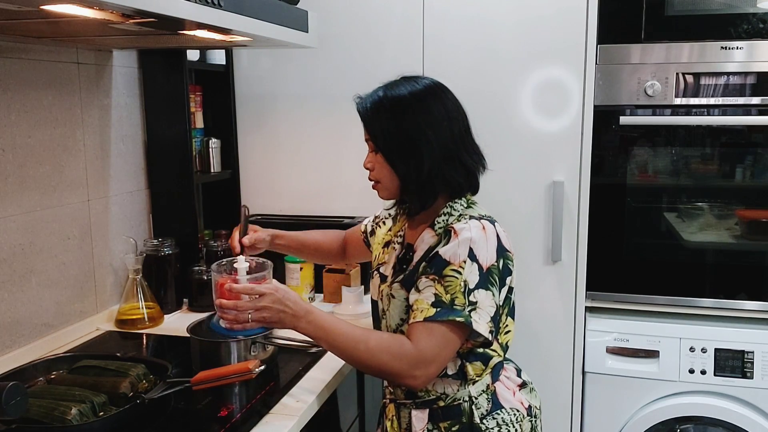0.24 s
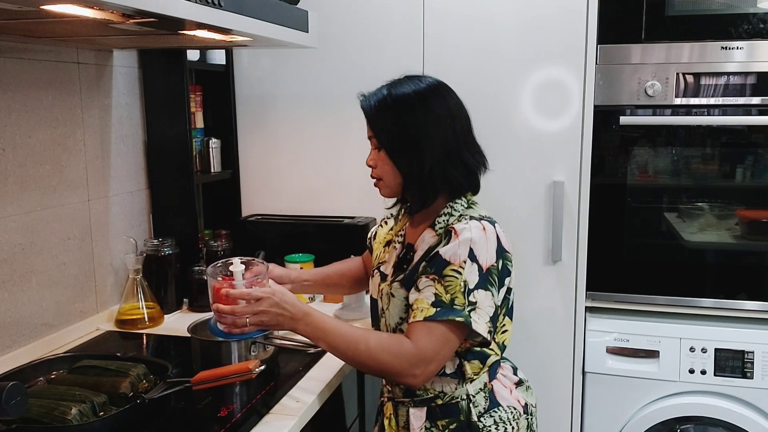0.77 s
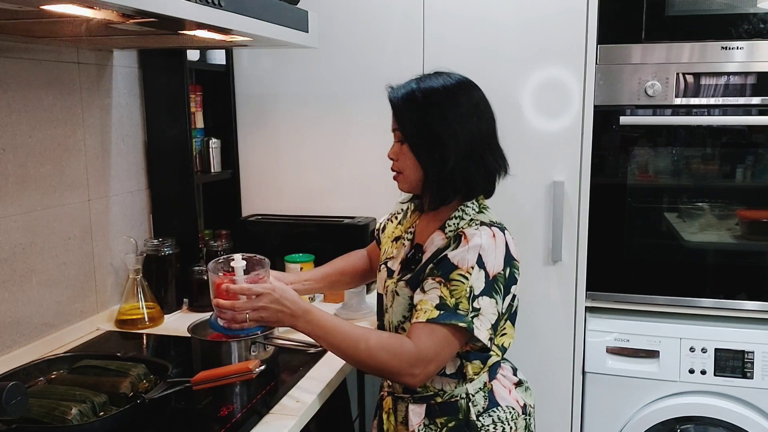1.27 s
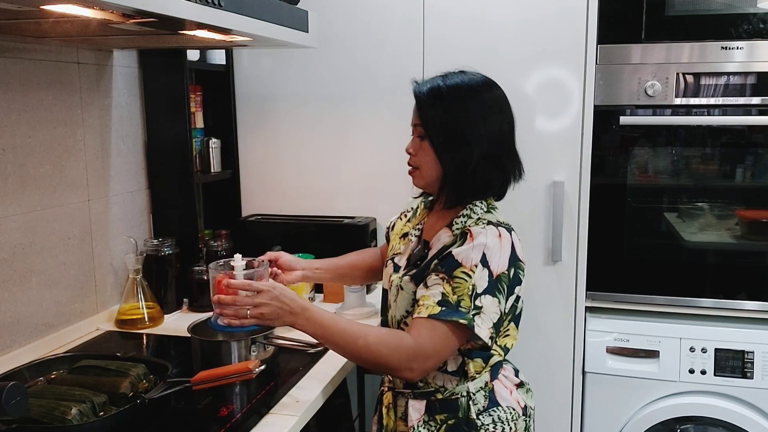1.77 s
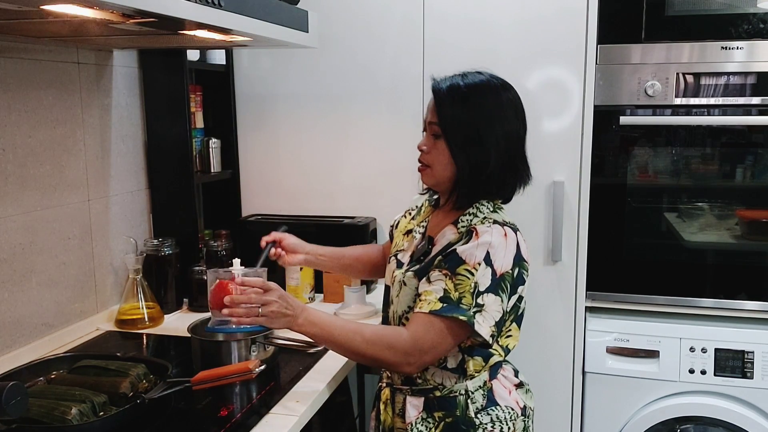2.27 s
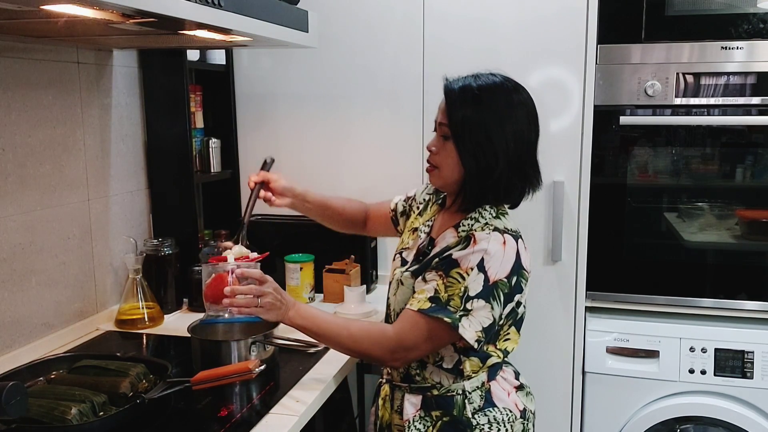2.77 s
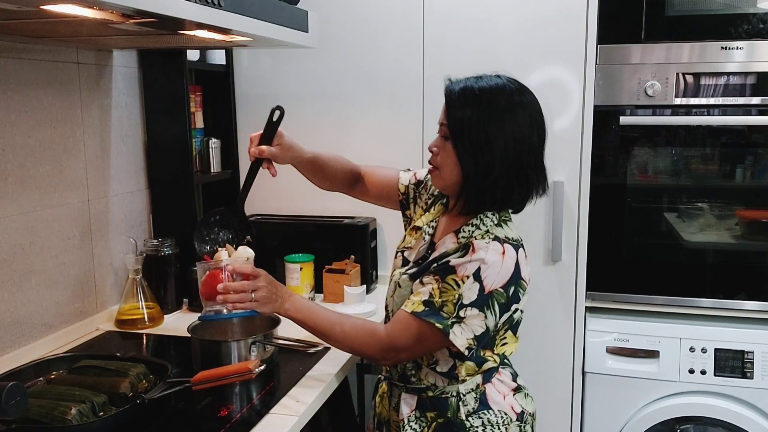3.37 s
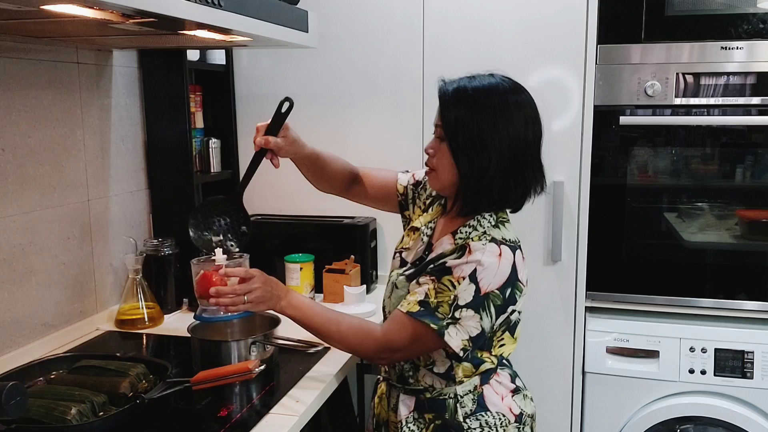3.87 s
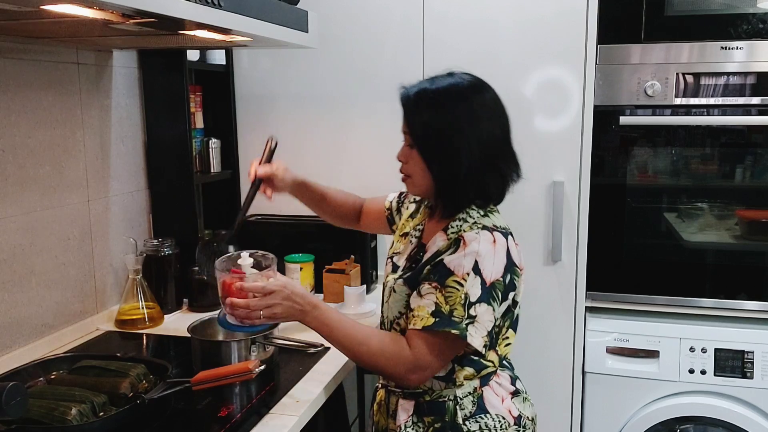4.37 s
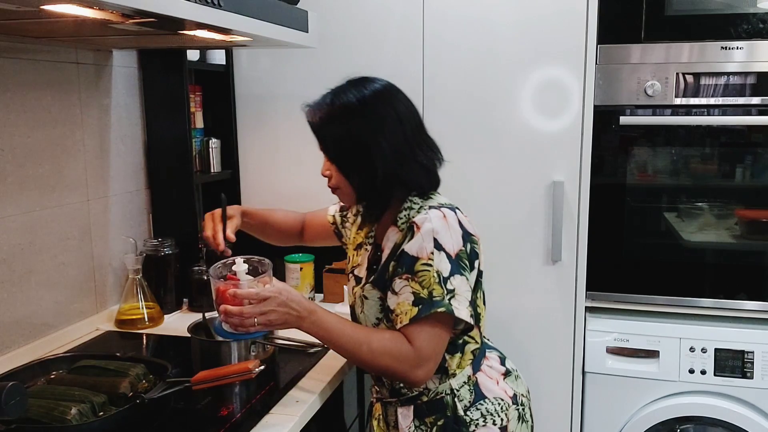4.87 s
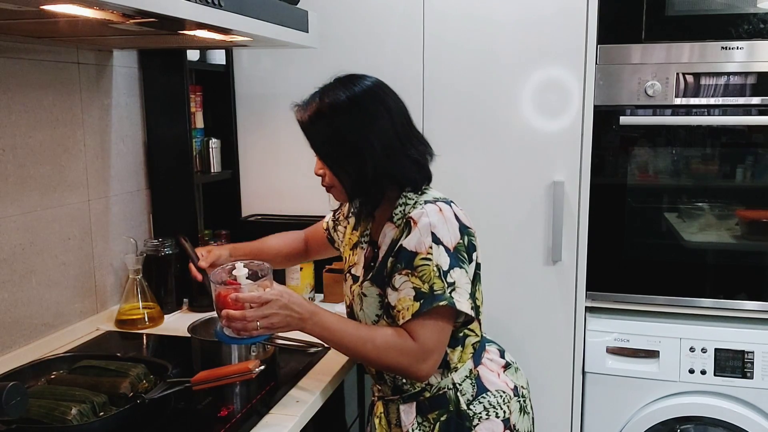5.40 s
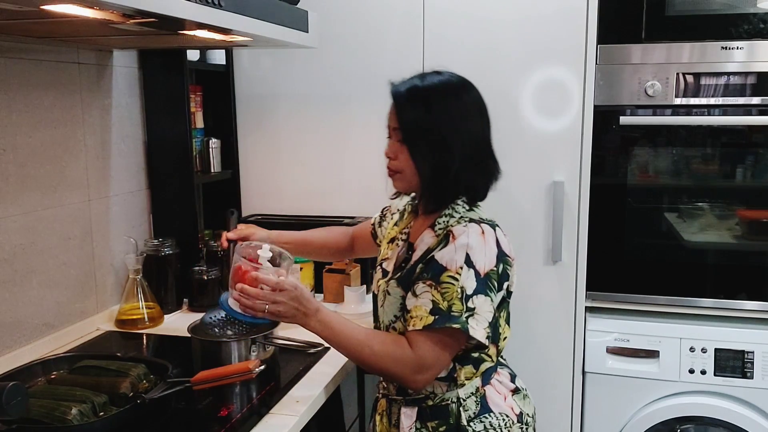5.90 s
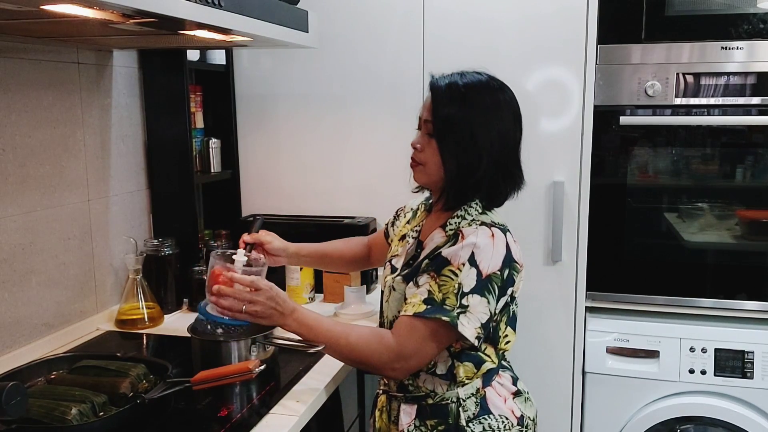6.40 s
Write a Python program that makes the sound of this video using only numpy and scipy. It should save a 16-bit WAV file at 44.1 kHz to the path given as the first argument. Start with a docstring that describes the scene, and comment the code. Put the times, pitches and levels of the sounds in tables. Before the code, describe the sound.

Oil sizzles and spits sharply in a frying pan while a ladle knocks a plastic cup, food plops, and a steel pot clanks twice.

```python
"""From the start oil sizzles and spits in a frying pan, as filtered random ticks, hiss and noise bursts,
over a faint mains hum (a sine) and room air. A cook ladles boiled tomatoes into a plastic chopper cup:
ladle and cup soon knock (noise bursts, band-pass notes, ringing sines) and single notes ring on.
From about 1 s wet plastic squeaks (wavering sines) and soft food plops into the cup.
After 4 s the ladle gurgles in the pot (band-passed crackle) and clanks twice on its ringing steel."""
import sys
import numpy as np
from scipy import signal
from scipy.fft import rfft, irfft
from scipy.io import wavfile
from scipy.ndimage import uniform_filter1d

SR = 44100
rng = np.random.default_rng(int(sys.argv[2]) if len(sys.argv) > 2 else 0)


def dump(signal):
    """Clip the signal to [-1, 1] and save it as 16-bit WAV at the path in sys.argv[1]."""
    limited = np.clip(np.atleast_2d(signal).T, -1, 1)
    pcm = np.round(limited * 32767).astype(np.int16)
    wavfile.write(sys.argv[1], SR, pcm)


N = 293115
TIME = np.arange(N) / SR
CUTOFF_HZ = 7850   # top of the microphone's range

# how hard the pan fries, as breakpoints before the mix: [t/s, sizzle level/dB]
FRYING_LEVEL = [(0, -37.5), (.28, -45), (.55, -40.5), (.88, -45), (1.35, -46.5), (1.75, -44.5),
                (2.33, -44.5), (2.7, -44.5), (3.0, -40.5), (3.17, -47), (3.33, -50), (3.62, -46),
                (4.17, -34.5), (4.48, -41), (4.8, -42), (5.02, -46.5), (5.15, -42), (5.55, -36.5),
                (6.05, -49), (6.65, -42)]
# ladle and cup knocking: [t/s, level/dB, hollow note f/Hz, thud re level/dB, cup wall drive/dB]
CUP_KNOCKS = [(0.1001, -35, 740, -14.5, -28.5), (0.5999, -40.5, 1070, -19, -37),
              (1.4242, -38, 1020, -41, -38), (1.5724, -38.5, 1020, -47, -39),
              (1.7945, -38, 916, -14.5, -29), (1.8332, -39.5, 1440, -20, -40), (1.845, -47, 950, -27, -49),
              (2.0167, -33, 1130, -32, -34), (2.1712, -38, 830, -22.5, -41),
              (2.7654, -37.5, 1590, -52, -49), (3.899, -29.5, 1030, -33, -51),
              (4.9585, -49.5, 427, -16.5, -46), (4.971, -50.5, 139, -20, -59), (5.2906, -31, 610, -15, -43),
              (5.6325, -38, 1020, -38, -34), (6.202, -38.5, 2000, -40, -46), (6.3904, -33.5, 940, -25, -37),
              (6.4025, -34, 1090, -24, -42), (6.42, -40.5, 810, -19, -46)]
# colour of a clack on plastic, a relative noise spectrum: [f/Hz, level per Hz/dB]
PLASTIC_COLOUR = [(300, -29), (560, -1), (1100, -9), (1550, 2.5), (3100, -2), (4000, -8.5), (7600, -15)]
# ladle on the steel pot, first wall, then rim, levels before colouring:
# [t/s, thud level/dB, hollow level/dB, hollow note f/Hz, clack level/dB, centre of quiet band f/Hz]
POT_BLOWS = [(4.6194, -53, -26, 554, -17, 2140), (5.4621, -49.5, -14.5, 994, -14, 4600)]


def from_db(db):
    """Amplitude ratio of a level in dB."""
    return 10 ** (np.asarray(db) / 20)


def rms_one(x):
    """Scale a whole sound to rms 1."""
    return x / np.sqrt(np.mean(x ** 2) + 1e-20)


def attack_one(x):
    """Scale a sound to rms 1 over its first 12 ms."""
    return x / np.sqrt(np.mean(x[:int(.012 * SR)] ** 2))


def add(track, s, sound):
    """Lay a sound into a track at a time in seconds."""
    at = max(int(s * SR), 0)
    track[at:at + len(sound)] += sound[:max(N - at, 0)]


def coloured(x, spectrum, resonances=()):
    """Causal minimum-phase filter, scaled so its power gain below the top cut averages 1 over all bins."""
    size = 8192
    hz = np.maximum(np.fft.rfftfreq(size, 1 / SR), 1)
    points = np.array(spectrum)
    db = np.interp(np.log(hz), np.log(points[:, 0]), points[:, 1])
    for centre, width, lift in resonances:
        db = db + lift / (1 + (2 * (hz - centre) / width) ** 2)
    gain = from_db(db) / np.sqrt(np.mean(from_db(db) ** 2 * (hz < CUTOFF_HZ)))
    # folding the cepstrum to positive times makes the filter minimum-phase
    cepstrum = irfft(np.log(gain))[:size // 2]
    cepstrum[1:] *= 2
    impulse = irfft(np.exp(rfft(cepstrum, size)))[:size // 2]
    return signal.oaconvolve(x, impulse)[:N]


def burst(fade_s, tail_db, tail_s, spiky):
    """A snap scattered by near surfaces: spiky noise with a fast and a slow fade; rms 1 over 12 ms."""
    t = TIME[:SR // 8]
    noise = rng.standard_normal(len(t))
    scatter = np.sign(noise) * np.abs(noise) ** max(spiky, 1)
    fade = np.exp(-t / fade_s) + from_db(tail_db) * np.exp(-t / tail_s)
    return attack_one(scatter * fade)


def bursts(times, levels_db, fade_s, tail_db, tail_s, spiky):
    """One burst at each time."""
    out = np.zeros(N)
    for s, db in zip(times, levels_db):
        add(out, s, from_db(db) * burst(fade_s, tail_db, tail_s, spiky))
    return out


def ring(hz, t60_s):
    """One struck mode: a sine that swells within a cycle while it dies away by 60 dB per t60."""
    t = TIME[:int(2 * t60_s * SR)]
    swell = np.minimum(hz * t, 1)
    return swell * np.sin(2 * np.pi * hz * t) * from_db(-60 * t / t60_s)


def crackle(per_s, spread_db, scatter_s):
    """Random ticks of uneven size, each scattered for a few milliseconds or more; rms 1."""
    sizes = from_db(spread_db * np.minimum(rng.exponential(1, N), 3))
    clicks = sizes * (rng.random(N) < per_s / SR)
    # each click feeds a decaying power that shapes noise
    power = signal.lfilter([1], [1, -np.exp(-2 / (scatter_s * SR))], clicks ** 2 + 1e-18)
    scattered = rms_one(np.sqrt(power) * rng.standard_normal(N))
    dry_ticks = rms_one(clicks * rng.choice([-1, 1], N))
    return rms_one(scattered + from_db(-9.0) * dry_ticks)


def pan_halves(low, high, split_hz=2100):
    """Deep and bright parts meet at a crossover, both voiced by the frying pan's resonances."""
    # overall frying colour, a relative spectrum: [f/Hz, level per Hz/dB]
    frying_colour = [(150, -32), (400, -19), (560, -8.5), (1000, -1.5), (2200, -0.5), (3300, 0.5),
                     (4450, -3.5), (6000, -3), (7500, -4.5)]
    # pan resonances laid over that colour: [f/Hz, width/Hz, lift/dB]
    pan_modes = [(610, 50, 3), (770, 60, 2), (1110, 100, 2.5), (1335, 50, 2), (1520, 90, 3.5),
                 (1770, 70, 2.5), (2800, 80, 6), (3070, 90, 3), (3730, 70, 4.5), (6900, 200, 2)]
    below = signal.butter(3, split_hz, "low", fs=SR, output="sos")
    above = signal.butter(3, split_hz, "high", fs=SR, output="sos")
    both = signal.sosfilt(below, low) + signal.sosfilt(above, high)
    return coloured(both, frying_colour, pan_modes)


def sizzle_level(spits):
    """The sizzle follows the frying and flares up briefly after each spit."""
    trim_db, flurry_db, flurry_s = 1.26, -27, 0.04   # flurry level re spit; its fading time
    power = from_db(trim_db + np.interp(TIME, *np.transpose(FRYING_LEVEL))) ** 2
    for s, db in spits:
        flurry = from_db(db + flurry_db) * np.exp(-TIME[:SR] / flurry_s)
        add(power, s, flurry ** 2)
    return np.sqrt(power)


def sizzling(level):
    """Small bubbles burst at random as dry ticks over fine hiss: some broad, some only deep or bright."""
    scatter_s = .0033
    broad = from_db(-3) * crackle(per_s=150, spread_db=2.0, scatter_s=scatter_s)
    deep = from_db(-7.0) * crackle(per_s=120, spread_db=1.5, scatter_s=scatter_s)
    bright = from_db(-4.5) * crackle(per_s=170, spread_db=-1.5, scatter_s=scatter_s)
    hiss = from_db(-10) * rng.standard_normal(N)
    return pan_halves(level * (broad + hiss + deep), level * (broad + hiss + bright))


def humming():
    """Mains hum of the hob: one steady sine at 100 Hz."""
    hum_db = -70.5   # rms
    return from_db(hum_db) * np.sqrt(2) * np.sin(2 * np.pi * 100 * TIME)


def room_air():
    """Steady, faint noise floor with most of its weight in the lows."""
    # colour of the air, a relative spectrum: [f/Hz, level per Hz/dB]
    air_colour = [(25, -26), (110, 3), (200, -10.5), (400, -1.5), (1500, -27)]
    return from_db(-71.5) * coloured(rng.standard_normal(N), air_colour)


def all_spits():
    """Loud spits, a splutter before each, and random small ones that grow with the frying."""
    # the louder oil spits: [t/s, nominal level before the body and crack mix/dB]
    loud_spits = [(0.0595, -21), (0.1996, -28.5), (0.3271, -23), (0.3642, -16.5), (0.419, -21.5),
                  (0.482, -21), (0.5218, -18), (.543, -22.5), (.573, -23), (0.625, -14.5), (0.7205, -11.5),
                  (0.933, -27.5), (0.9994, -21.5), (1.1155, -26.5), (1.1693, -18), (1.2158, -24),
                  (1.2794, -25.5), (1.334, -27.5), (1.733, -22.5), (1.967, -23.5), (2.184, -21.5),
                  (2.25, -30), (2.424, -18.5), (2.616, -24.5), (2.8539, -20.5), (2.9113, -25.5),
                  (2.9646, -15), (3.06, -26), (3.282, -30.5), (3.399, -29.5), (3.44, -30.5), (3.668, -32.5),
                  (3.6988, -21.5), (3.7073, -24.5), (3.767, -24.5), (3.8835, -18), (3.944, -19.5),
                  (4.0882, -20), (4.134, -15.5), (4.2736, -23), (4.3036, -9.5), (4.5391, -12), (4.6, -18.5),
                  (4.6901, -21.5), (4.7439, -17.5), (4.807, -24.5), (4.865, -17), (4.9041, -17.5),
                  (5.032, -26.5), (5.112, -18), (5.2128, -19), (5.406, -14), (5.527, -20), (5.5741, -17.5),
                  (5.686, -25.5), (5.7647, -14.5), (5.8457, -19.5), (5.865, -20.5), (5.928, -17.5),
                  (5.9982, -26.5), (6.0186, -19.5), (6.088, -24.5), (6.1324, -20), (6.19, -28),
                  (6.3042, -19), (6.4567, -23), (6.6063, -24)]
    small_per_s, small_db, small_spread_db = 7, 9, 5   # level is relative to the sizzle
    splutter_db, longest_lead_s = -13.5, .03   # a drop splutters before it bursts; level re spit
    count = int(small_per_s * N / SR)
    s = rng.uniform(0, N / SR, count)
    frying_db = np.interp(s, *np.transpose(FRYING_LEVEL))
    db = frying_db + small_db + rng.normal(0, small_spread_db, count)
    forerunners = [(at - longest_lead_s * rng.random() ** 2, spit_db + splutter_db)
                   for at, spit_db in loud_spits]
    return np.vstack([loud_spits, forerunners, np.column_stack([s, db])])


def spit_tone(sound, lift_db=3):
    """Every bubble has a size of its own, which lifts one part of the treble at equal energy."""
    hz = rng.uniform(2400, 7200)
    peak = signal.lfilter(*signal.iirpeak(hz, 4, fs=SR), sound)
    toned = sound + from_db(lift_db) * peak
    return toned * np.linalg.norm(sound) / np.linalg.norm(toned)


def spitting(spits):
    """Water drops explode in the oil and rattle the pan; the bigger the drop, the deeper the pop."""
    big_spit_db, deepening = -9, 0.28   # dB of body lost per dB that a spit is below a big one
    body_mix_db, crack_mix_db = -10.5, -13   # deep pop and fine crack
    hood_echo_s, hood_echo_db = .0047, -3.5   # the cooker hood throws each deep pop back
    s, spit_db = np.transpose(spits)
    body_db = spit_db + deepening * (spit_db - big_spit_db)
    body = np.zeros(N)
    for lag_s, db in [(0, 0), (hood_echo_s, hood_echo_db)]:
        body += bursts(s + lag_s, body_db + db, fade_s=0.005, tail_db=-11, tail_s=0.028, spiky=1.3)
    crack = np.zeros(N)
    for at, db in zip(s, spit_db):
        snap = burst(fade_s=0.006, tail_db=-1.5, tail_s=0.032, spiky=1.55)
        add(crack, at, from_db(db) * spit_tone(snap))
    return pan_halves(from_db(body_mix_db) * body, from_db(crack_mix_db) * crack)


def evened(snap, width_hz=350):
    """Level out a noise snap's broad humps and dips, so every clack has an even colour before filtering."""
    spectrum = rfft(snap, SR)   # bins 1 Hz apart
    power = uniform_filter1d(np.abs(spectrum) ** 2, size=int(width_hz))
    return attack_one(irfft(spectrum / np.sqrt(power))[:len(snap)])


def blows(rows, colour, hollow_octaves, scatter_db, scatter_s, thud_s, rattle_db, rattle_s, dips=()):
    """Each blow: a thud through the hob, a short hollow note with scatter, a sharp clack that rattles on."""
    # rows start with: t/s, thud level/dB, hollow level/dB, hollow note f/Hz, clack level/dB
    # colour of the thud, a relative spectrum: [f/Hz, level per Hz/dB]
    thud_colour = [(35, -44), (90, -5.5), (150, -5), (205, -13), (275, 1), (500, -2), (900, -19)]
    hollow, clack = np.zeros(N), np.zeros(N)
    for s, _, hollow_db, hz, clack_db, *_ in rows:
        edges_hz = hz * 2 ** (hollow_octaves * np.array([-.5, .5]))
        band = signal.butter(2, edges_hz, "band", fs=SR, output="sos")
        note = attack_one(signal.sosfilt(band, signal.unit_impulse(SR // 8)))
        noise = burst(scatter_s, tail_db=-15.0, tail_s=0.054, spiky=1)
        scatter = attack_one(signal.sosfilt(band, noise))
        add(hollow, s, from_db(hollow_db) * note)
        add(hollow, s + 0.00407, from_db(hollow_db + scatter_db) * scatter)
        add(clack, s, from_db(clack_db) * evened(burst(.003, rattle_db, rattle_s, spiky=1.5)))
    s, thud_db = np.transpose(rows)[:2]
    thud = bursts(s, thud_db, thud_s, tail_db=-8.5, tail_s=0.049, spiky=1)
    return hollow + from_db(9.5) * coloured(thud, thud_colour) + coloured(clack, colour, dips)


def knocking():
    """Hard contacts: the clack grows in step with the hollow note, and fades as the note gets deeper."""
    clack_re_level_db = 4.5
    hard_hz, softening_db_per_octave = 920, 14   # deeper knocks are softer contacts and clack less
    rows = []
    for s, db, hz, thud_db, _ in CUP_KNOCKS:
        softening_db = softening_db_per_octave * min(np.log2(hz / hard_hz), 0)
        rows.append((s, db + thud_db, db, hz, db + clack_re_level_db + softening_db))
    return blows(rows, PLASTIC_COLOUR, hollow_octaves=.7, scatter_db=-5, scatter_s=.007,
                 thud_s=0.016, rattle_db=-3, rattle_s=0.022)


def cup_ringing():
    """The plastic cup rings after a knock: base modes follow the thud, wall modes their own drive."""
    # plastic cup, base modes then wall modes: [f/Hz, t60/s, level re drive/dB]
    cup_modes = [(318, .22, 6), (395, .08, 12), (585, .3, 1), (716, .16, 9), (1485, .11, 0),
                 (2320, .12, -7)]
    base_below_hz = 1000
    favour_max_db, favour_hz = 11.5, 60   # lift of a base mode near the hollow pitch; how near it must lie
    out = np.zeros(N)
    for s, db, hollow_hz, thud_db, wall_db in CUP_KNOCKS:
        for k, (hz, t60_s, mode_db) in enumerate(cup_modes):
            favour_db = favour_max_db / (1 + ((hz - hollow_hz) / favour_hz) ** 2)
            drive_db = db + thud_db + favour_db if hz < base_below_hz else wall_db
            level_db = drive_db + mode_db + rng.normal(0, 1)
            add(out, s, (-1) ** k * from_db(level_db) * ring(hz, t60_s))   # alternating polarity
    return out


def single_note_ringing():
    """Single decaying notes that ring on after a knock, a plop or a squeak."""
    # single notes: [t/s, level/dB, f/Hz, t60/s]
    single_notes = [(.1002, -14, 2170, .027), (2.824, -39, 645, .35), (3.121, -37, 2380, .17)]
    out = np.zeros(N)
    for s, db, hz, t60_s in single_notes:
        add(out, s, from_db(db) * ring(hz, t60_s))
    return out


def squeaks(waver=0.055, sag=0.1):
    """A short stick-slip chirp with an unsteady, falling pitch and a rough, catching level."""
    # wet plastic slipping: [t/s, level before doubling and shaping/dB, mid-chirp f/Hz, length/s]
    slips = [(.949, -37.5, 2650, 0.011), (1.697, -34.5, 2390, 0.008), (1.935, -42, 2350, 0.042),
             (2.158, -41, 2340, 0.014), (3.12, -35, 2445, 0.0073)]
    out = np.zeros(N)
    for s, db, hz, length in slips:
        t = TIME[:int(length * SR)]
        smooth_noise = rms_one(uniform_filter1d(rng.standard_normal((2, SR // 10)), size=30))
        unsteady, catching = smooth_noise[:, :len(t)]
        pitch_hz = hz * (1 + waver * unsteady + sag * (.5 - t / length))
        phase = 2 * np.pi * np.cumsum(pitch_hz) / SR
        swell = np.sin(np.pi * np.sqrt(t / length))
        add(out, s, 2 * from_db(db) * swell * (1 + .5 * catching) * np.sin(phase))
    return out


def plopping():
    """Soft food lands in the cup: mostly the hollow note, with hardly any clack."""
    # food drops: [t/s, hollow level/dB, hollow note f/Hz]
    food_drops = [(.9515, -48.5, 764), (1.7554, -43.5, 830), (1.982, -43, 910), (2.8207, -37.5, 824),
                  (3.365, -34, 990), (4.53, -40, 623)]
    thud_db, clack_db = -29, -7   # re the hollow level, before colouring
    rows = [(s, db + thud_db, db, hz, db + clack_db) for s, db, hz in food_drops]
    return blows(rows, PLASTIC_COLOUR, hollow_octaves=0.61, scatter_db=-1, scatter_s=0.0051,
                 thud_s=0.032, rattle_db=-1.5, rattle_s=0.027)


def sloshing(low_hz=240, high_hz=540):
    """Low gurgles as the ladle dips into the pot for more: band-passed crackle."""
    # ladle moving through the water, silent outside these breakpoints: [t/s, level/dB]
    gurgle_level = [(4.2, -62), (4.85, -55.5), (5.1, -76.5), (5.38, -54), (5.6, -68)]
    band = signal.butter(2, [low_hz, high_hz], "band", fs=SR, output="sos")
    bubbles = crackle(per_s=84, spread_db=0.5, scatter_s=0.023)
    level_db = np.interp(TIME, *np.transpose(gurgle_level), left=-np.inf, right=-np.inf)
    return rms_one(signal.sosfilt(band, bubbles)) * from_db(level_db)


def clanking():
    """Blows on the steel pot: a brighter clack than on plastic, each with a quiet band of its own."""
    # colour of a blow on steel, a relative spectrum: [f/Hz, level per Hz/dB]
    steel_colour = [(200, -26), (330, -12), (750, -6.5), (1500, 4.5), (2400, 1.5), (3700, 5.5), (4600, -9),
                    (6000, -2), (7600, -8)]
    out = np.zeros(N)
    for row in POT_BLOWS:
        quiet_band = (row[-1], 650, -12)   # centre Hz, width Hz, dB
        out += blows([row], steel_colour, hollow_octaves=0.65, scatter_db=-13, scatter_s=0.0066,
                     thud_s=0.039, rattle_db=-12.5, rattle_s=0.05, dips=[quiet_band])
    return out


def pot_ringing():
    """The steel rings in close, beating pairs of modes, damped by water; the struck spot balances them."""
    # steel pot modes, levels re the clack before trim: [f/Hz, wall blow level/dB, rim blow level/dB]
    pot_modes = [(530, -9, -24), (612, -15, -21), (712, -14, -24), (770, -22, -14), (1110, -18, -9),
                 (1335, -17, -14), (1518, -7, -13), (1770, -16, -20), (2590, -24, -6), (2803, -14, -14),
                 (3228, -15, -10), (3520, -12, -19), (3730, -11, -21), (5950, -15, -23), (7000, -27, -21)]
    trim_db, t60_s, split_hz = -1.5, .19, 18   # split: standard deviation within a pair
    out = np.zeros(N)
    for spot, (s, _, _, _, clack_db, _) in enumerate(POT_BLOWS):
        for hz, *spot_db in pot_modes:
            pair = ring(hz, t60_s) + .5 * ring(hz + rng.normal(0, split_hz), t60_s)
            level_db = clack_db + trim_db + spot_db[spot]
            add(out, s + rng.uniform(0, .002), from_db(level_db) * pair)
    return out


def kitchen(x):
    """Tiles and cupboards return a short diffuse tail: decaying noise with a soft onset."""
    t60_s, tail_db = 0.2, -11
    t = TIME[:SR // 2]
    onset = 1 - np.exp(-(t / 0.0035) ** 2)
    tail = rng.standard_normal(len(t)) * from_db(-60 * t / t60_s) * onset
    return x + from_db(tail_db) * signal.oaconvolve(x, tail / np.linalg.norm(tail))[:N]


def scene():
    """Frying and ladling in the kitchen, with pot and cup ringing, hum and air added without its tail."""
    spits = all_spits()
    frying = sizzling(sizzle_level(spits)) + spitting(spits)
    ladling = knocking() + single_note_ringing() + squeaks() + plopping() + sloshing() + clanking()
    ringing = cup_ringing() + pot_ringing()
    return (kitchen(frying + ladling) + ringing + humming() + room_air())[None]


def record(dry):
    """A narrow-band microphone: the hardest peaks are rounded, the deep bass is thin, the top is cut."""
    top_cut = signal.firwin(171, CUTOFF_HZ, window=("kaiser", 7), fs=SR)[None]
    bass_cut = signal.butter(2, 62, "high", fs=SR, output="sos")
    heard = signal.oaconvolve(dry, top_cut, "same")
    rounded = heard / (1 + (heard / .84) ** 8) ** (1 / 8)   # bends towards a ceiling of .84
    return signal.oaconvolve(signal.sosfilt(bass_cut, rounded), top_cut, "same")


dry = scene()
out = record(dry)
dump(out)
```